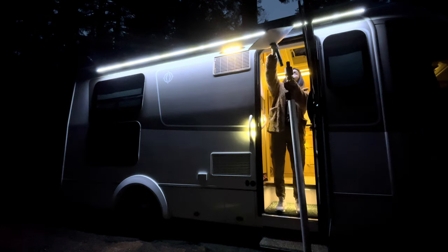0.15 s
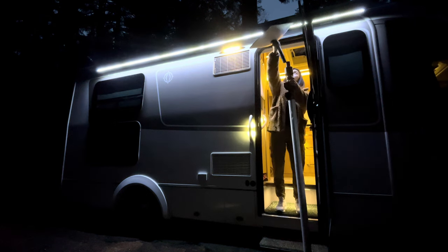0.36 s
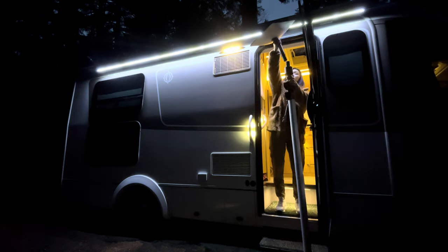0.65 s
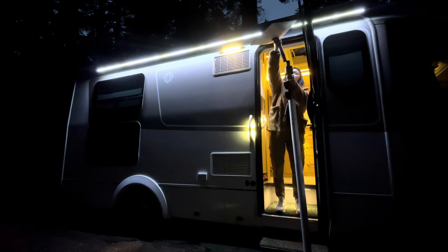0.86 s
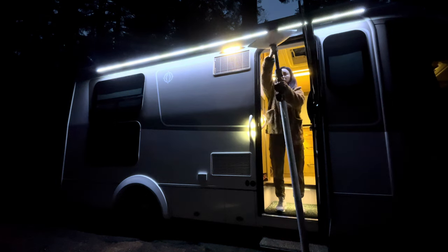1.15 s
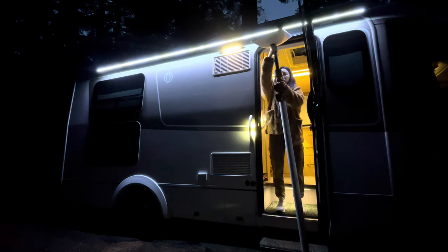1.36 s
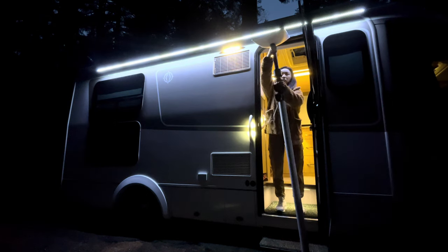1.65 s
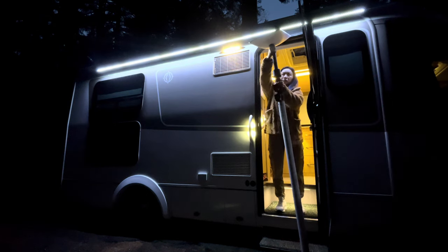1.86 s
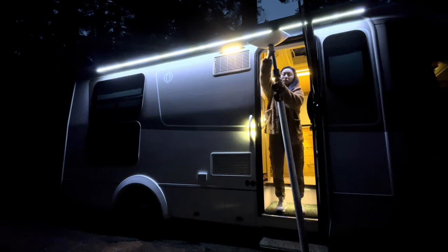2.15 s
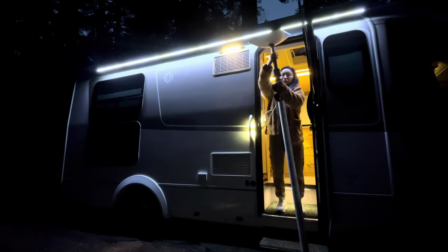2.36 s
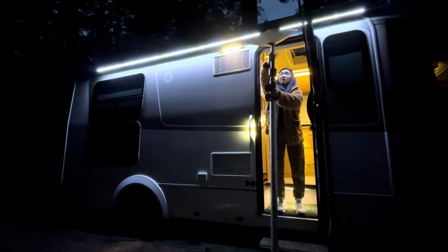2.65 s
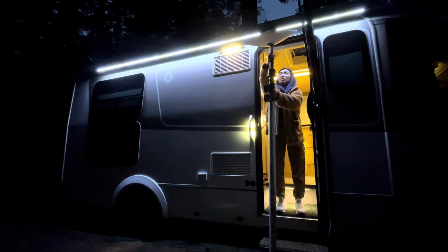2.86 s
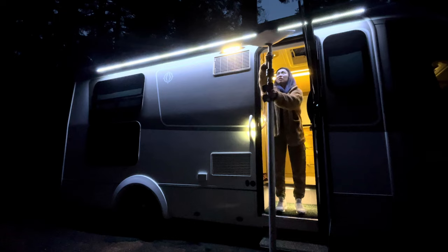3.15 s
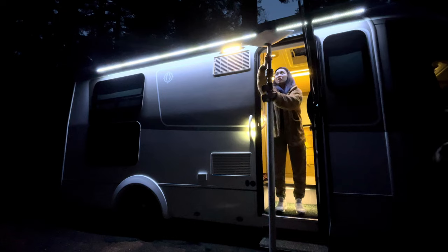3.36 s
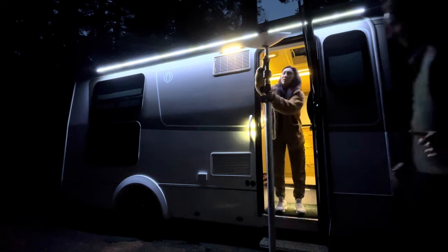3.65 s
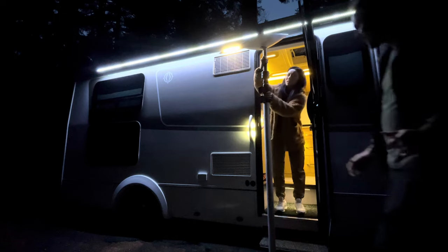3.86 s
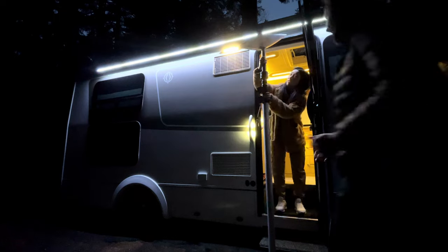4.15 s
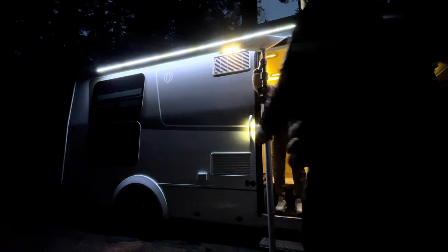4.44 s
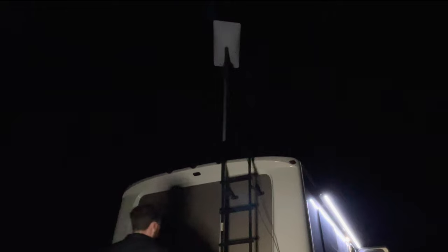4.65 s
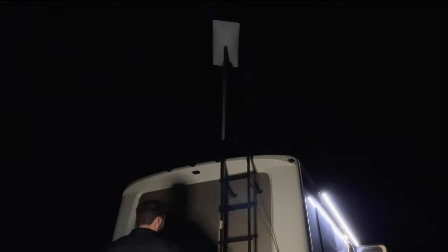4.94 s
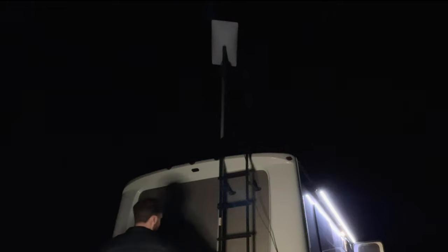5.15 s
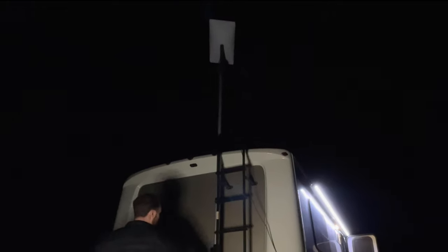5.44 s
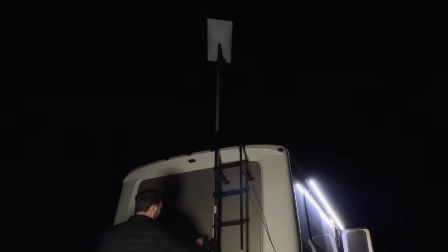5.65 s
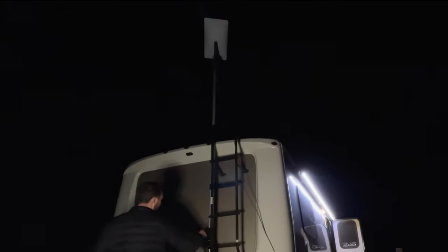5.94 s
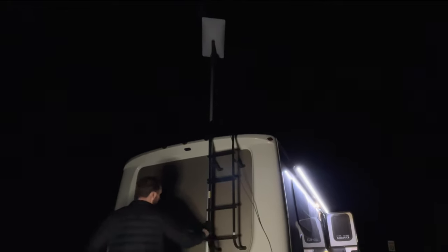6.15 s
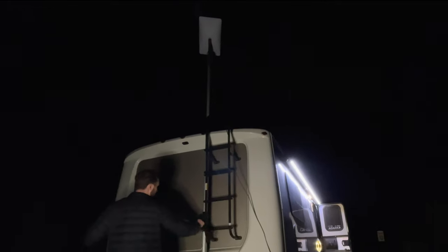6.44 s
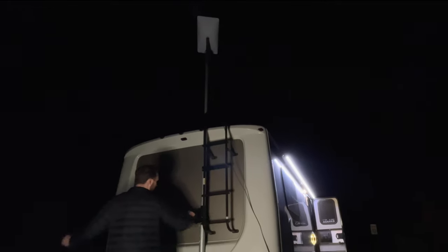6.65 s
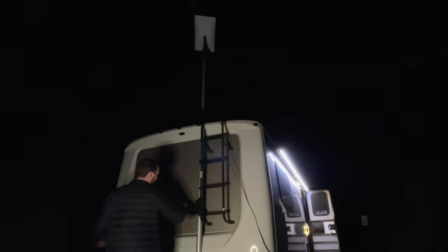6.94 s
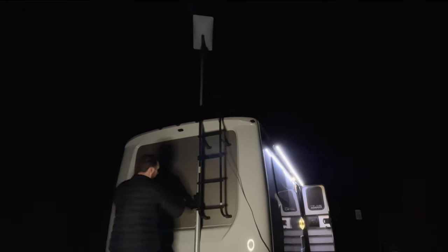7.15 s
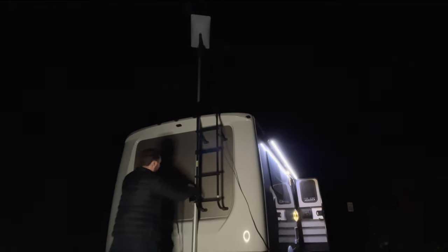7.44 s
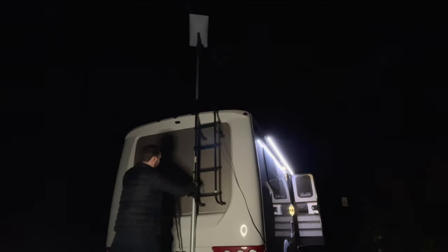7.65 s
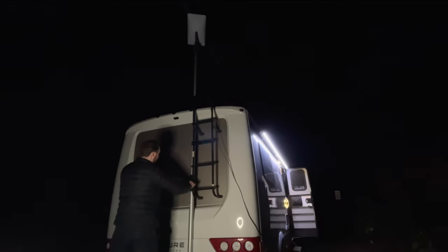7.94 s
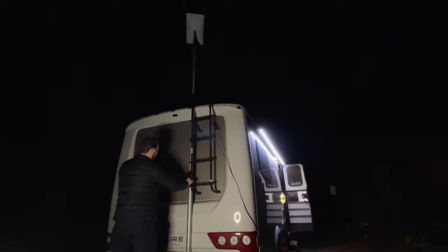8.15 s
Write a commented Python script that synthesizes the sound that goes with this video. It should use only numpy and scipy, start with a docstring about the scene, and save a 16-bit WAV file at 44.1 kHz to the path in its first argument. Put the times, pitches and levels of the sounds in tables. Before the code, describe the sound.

Quiet outdoor night, faint hiss leaning right, thin low rumble. From 0.1 to 0.8 s tiny dry ticks of a pole fitting; at 0.85-0.9 a quick rattly clack with a faint hollow bong. Soft tube bongs and a sleeve swish around 1.1-1.5, then at 1.8 by far the loudest event: a bright, clattery catch snap with a short echo. Small scrapes and rustle follow around 2.1. At 2.7 a sharp dry joint knock, at 2.98 a high ringing clamp clink, at 3.45 a strong double knock, then weaker knocks to 4.3 and rattling clinks at 4.4-4.5. At 4.6 an abrupt cut behind the van: louder, deep, nearly mono rumble and a faint low drone. A soft thud and knock at 5.0; cloth and hands rub, swelling at 6.1 and 6.6. Faint knock at 7.6, then dull woody-metal ladder knocks at 7.85-8.05, strongest near 8, with a brief swish, ending in rumble.

```python
"""A telescopic metal pole is put together at night beside a parked van: the tube bongs, a catch snaps, a clamp
rings, sections knock into their joints; each body is a set of decaying modes with a burst of noisy rattle.
Sleeves swish and hands rub: clumpy banded noise and ringing slips. A few short narrow tones come between.
From 4.6 s the listener stands behind the van in a louder low rumble of filtered noise, and the pole knocks
softly on a ladder. A faint night hiss lies under it all."""
import sys
import numpy as np
from scipy import signal
from scipy.fft import rfft, irfft
from scipy.io import wavfile

SR = 44100
rng = np.random.default_rng(int(sys.argv[2]) if len(sys.argv) > 2 else 0)


def put_to_file(sound):
    """Save the sound as 16-bit audio at rate SR, in the file named by the first command-line argument."""
    columns = np.atleast_2d(sound).T  # one column per channel
    safe = np.clip(columns, -1, 1)
    whole_steps = np.round(safe * 32767)
    wavfile.write(sys.argv[1], SR, whole_steps.astype(np.int16))


N = 366471
MOVE_S = 4.603   # from here on the listener is behind the van
BEHIND_VAN = np.arange(N) >= MOVE_S * SR

# Bongs of the tube. Each row: start in seconds, peak of the lows in dB, peak of the highs in dB,
# rattle T60 in seconds; peaks are those before panning.
TUBE_BONGS = [(0.815, -46.5, -36, 0.11), (0.889, -61, -47, 0.03), (1.107, -45.5, -38.5, 0.086),
              (1.431, -44, -63, 0.11), (1.806, -37.5, -41, 0.091), (2.057, -88, -43, 0.04),
              (2.708, -42.5, -41.5, 0.45)]
# Modes of the hollow tube. Each row: pitch in Hz, relative level in dB, T60 in seconds.
TUBE_MODES = [(167, -2, .2), (465, -6, .16), (425, -3, .055), (1040, -6, .06)]
# Colour of the tube's rattle. Each row: frequency in Hz, relative level in dB.
TUBE_RATTLE_COLOUR = [(100, -20.5), (450, -23.5), (2400, -31), (8000, -44)]


def tube_bongs():
    """The hollow tube rings in a few low modes; the blow decides how much of the highs it wakes."""
    return blows(TUBE_BONGS, TUBE_MODES, TUBE_RATTLE_COLOUR, rattle_db=-15.5, rise_ms=1.7, pan_db=-2.0,
                 split_hz=310, lag=4, spread=0.0043)


# The catch snapping. Each row: start in seconds, peak of the lows in dB, peak of the highs in dB,
# rattle T60 in seconds; peaks are those before panning.
CATCH_SNAPS = [(1.793, -10, -6, 0.094)]
# Modes of the catch. Each row: pitch in Hz, relative level in dB, T60 in seconds.
CATCH_MODES = [(732, -19, .06), (1745, -14, .045), (1895, -14, .05), (2155, -14, .06), (4550, -10, .07),
               (4880, -27, .45), (4950, -8, .09), (5185, -5, .07), (5230, -27, .55), (6090, -27, .4),
               (6595, -13, .04), (6110, -7, .065), (11800, -12, .03)]
# Colour of the catch's rattle. Each row: frequency in Hz, relative level in dB.
CATCH_RATTLE_COLOUR = [(200, -27), (715, -14), (1380, -22), (2000, -10), (3070, -27), (5110, -2.5),
                       (7220, -9.5), (12000, -14.5), (15500, -22.5)]


def catch_snaps():
    """Loose parts of the catch split each bright mode into a wide cluster of nine."""
    return blows(CATCH_SNAPS, CATCH_MODES, CATCH_RATTLE_COLOUR, rattle_db=2.5, rise_ms=1.0, pan_db=-0.5,
                 spread=0.015, size=16384, count=9)


# Clinks of the clamp. Each row: start in seconds, peak of the lows in dB, peak of the highs in dB,
# rattle T60 in seconds; peaks are those before panning.
CLAMP_CLINKS = [(2.98, -37.5, -15, 0.14), (2.992, -39.5, -18, 0.11), (3.771, -54, -39.5, 0.13),
                (4.513, -43, -33.5, 0.23), (4.526, -53, -29, 0.19)]
# Modes of the clamp. Each row: pitch in Hz, relative level in dB, T60 in seconds.
CLAMP_MODES = [(2073, -9, .21), (3984, -33, .36), (4500, -5, .016), (6455, -11, .16), (6600, -9, .08),
               (9437, -19, .1), (13200, -11, .04)]
# Colour of the clamp's rattle. Each row: frequency in Hz, relative level in dB.
CLAMP_RATTLE_COLOUR = [(300, -1.5), (4140, -7), (5570, -14), (6460, -3), (7620, -8.5), (13000, -9.5),
                       (15500, -20)]


def clamp_clinks():
    """The clamp rings in high modes, each a tight cluster of three."""
    return blows(CLAMP_CLINKS, CLAMP_MODES, CLAMP_RATTLE_COLOUR, rattle_db=-7.5, rise_ms=1.0, pan_db=0.5,
                 spread=0.00393, size=16384)


# Sections knocking into their joints. Each row: start in seconds, peak of the lows in dB,
# peak of the highs in dB, rattle T60 in seconds; peaks are those before panning.
JOINT_KNOCKS = [(1.803, -19, -42, 0.036), (2.681, -41.5, -42, 0.11), (2.691, -18.5, -50, 0.015),
                (2.696, -42, -14, 0.072), (2.706, -24.5, -43, 0.029), (2.759, -40.5, -63, 0.062),
                (3.44, -30, -20.5, 0.042), (3.455, -18, -14, 0.059), (3.488, -29, -34, 0.031),
                (3.501, -32.5, -33.5, 0.032), (3.711, -34.5, -77, 0.081), (4.096, -39.5, -50.5, 0.13),
                (4.104, -33, -54, 0.057), (4.181, -36.5, -38, 0.1), (4.266, -39, -31.5, 0.04),
                (4.317, -45.5, -47, 0.015)]
# Modes of a joint. Each row: pitch in Hz, relative level in dB, T60 in seconds.
JOINT_MODES = [(866, -12, .035), (964, -10, .04), (1120, -11, .035), (1600, -14, .035)]
# Colour of the joint's rattle. Each row: frequency in Hz, relative level in dB.
JOINT_RATTLE_COLOUR = [(200, -21.5), (630, -6.5), (957, 17.5), (1350, 4.5), (4660, -13.5), (7480, -22),
                       (13000, -20), (15500, -32.5)]


def joint_knocks():
    """A joint's close-set modes die fast, which makes a short, dry knock."""
    return blows(JOINT_KNOCKS, JOINT_MODES, JOINT_RATTLE_COLOUR, rattle_db=-9.0, rise_ms=0.96, pan_db=-3.0, lag=2)


# Three gestures of a fitting: sharp ticks, ringing clacks of the loose fitting, scrapes along the tube.
# Each row: start in seconds, peak of the lows in dB, peak of the highs in dB, rattle T60 in seconds;
# peaks are those before panning.
FITTING_TICKS = [(0.072, -41.5, -48, 0.058), (0.118, -34, -40.5, 0.082), (0.154, -44.5, -45, 0.044),
                 (0.34, -43.5, -45, 0.16), (0.7, -45, -55, 0.08), (0.748, -40, -44, 0.075),
                 (1.455, -36, -69, 0.14), (1.526, -44.5, -40.5, 0.11), (1.909, -37, -35.5, 0.036),
                 (2.418, -48, -38, 0.088), (3.153, -44.5, -62, 0.037), (3.957, -67, -47, 0.034)]
FITTING_CLACKS = [(0.85, -37, -40, 0.071), (0.866, -44, -38, 0.027), (0.875, -38, -36, 0.079),
                  (0.889, -25, -31.5, 0.025), (0.902, -29, -35, 0.02), (4.382, -54, -37, 0.056),
                  (4.391, -58, -33.5, 0.061), (4.4, -45, -31, 0.042), (4.42, -45, -34, 0.042)]
FITTING_SCUFFS = [(2.053, -42, -41, 0.046), (2.114, -42, -38, 0.19), (2.86, -44, -47, 0.07)]
# Modes of the fitting. Each row: pitch in Hz, relative level in dB, T60 in seconds.
FITTING_MODES = [(2500, -13, .025), (3600, -9, .014)]
# Colour of the fitting's rattle. Each row: frequency in Hz, relative level in dB.
FITTING_RATTLE_COLOUR = [(200, -13), (940, -12), (2560, -12), (9480, -16), (15500, -26.5)]


def fitting_sounds():
    """Two short modes: fast noisy onsets tick, ringing ones clack, slow onsets scrape."""
    body = (FITTING_MODES, FITTING_RATTLE_COLOUR)
    ticks = blows(FITTING_TICKS, *body, rattle_db=6.0, rise_ms=0.21, pan_db=-2, lag=18)
    clacks = blows(FITTING_CLACKS, *body, rattle_db=-16.0, rise_ms=1.0, pan_db=-3.5,
                   split_hz=3200, lag=18, spread=0.01)   # split between the two modes
    scuffs = blows(FITTING_SCUFFS, *body, rattle_db=-21.0, rise_ms=11.0, pan_db=-4.0, split_hz=2000, lag=18)
    return ticks + clacks + scuffs


# The pole knocking on the ladder. Each row: start in seconds, peak of the lows in dB,
# peak of the highs in dB, rattle T60 in seconds; peaks are those before panning.
POLE_ON_LADDER = [(4.973, -44.5, -46, 0.11), (7.567, -47, -64, 0.068), (7.846, -32, -46.5, 0.061),
                  (7.974, -25, -48, 0.012), (7.994, -31.5, -58, 0.13), (7.999, -47, -36, 0.066),
                  (8.043, -34, -51, 0.12)]
# Modes of the ladder. Each row: pitch in Hz, relative level in dB, T60 in seconds.
LADDER_MODES = [(880, -5, .07), (1300, -7, .11), (2300, -16, .03)]
# Colour of the ladder's rattle. Each row: frequency in Hz, relative level in dB.
LADDER_RATTLE_COLOUR = [(300, -3), (892, 11), (1560, -2), (2560, -21), (4570, -39.5), (15500, -57)]


def ladder_knocks():
    """A slow onset and a dull rattle make the ladder's knocks soft; they sit left."""
    return blows(POLE_ON_LADDER, LADDER_MODES, LADDER_RATTLE_COLOUR, rattle_db=7.5, rise_ms=4.2, pan_db=4.0, lag=-4)


# Thuds of a foot. Each row: start in seconds, peak of the lows in dB, peak of the highs in dB,
# rattle T60 in seconds; peaks are those before panning.
FOOT_THUDS = [(3.512, -44, -39.5, 0.11), (4.971, -44, -39, 0.028)]
# Modes of the thud. Each row: pitch in Hz, relative level in dB, T60 in seconds.
FOOT_MODES = [(93, 11, 0.026), (205, 1.5, 0.022), (568, -23.5, 0.11)]
# Colour of the thud's rattle. Each row: frequency in Hz, relative level in dB.
FOOT_RATTLE_COLOUR = [(40, -72), (100, -12), (500, 13), (1500, -21), (8000, -71)]


def foot_thuds():
    """Strongly damped low modes with a slow onset make a thud."""
    return blows(FOOT_THUDS, FOOT_MODES, FOOT_RATTLE_COLOUR, rattle_db=-13.5, rise_ms=8.5, pan_db=-3.5, split_hz=210)


# Colour of cloth and hands. Each row: frequency in Hz, relative level in dB.
CLOTH_COLOUR = [(250, -5), (650, -9.5), (1000, -8.5), (1500, -11.5), (2400, -11.5), (3200, -14.5),
                (6900, -15.5), (10100, -18.5), (12500, -20), (15800, -28.5)]
# Bands that colour the rubbing behind the van. Each row: centre in Hz, width in Hz,
# level in dB against the unit hiss when the stroke is at -43.5 dB.
RUBBING_BANDS = [(2050, 400, -5), (2450, 130, -7), (2800, 150, -14)]
# One more band glides up with the stroke: pitch at a -50.5 dB stroke, level at a -43.5 dB stroke.
GLIDE_HZ, GLIDE_HZ_PER_DB, GLIDE_WIDTH_HZ, GLIDE_DB = 888, 50, 36, -5
RUB_GROWTH = 0.62   # dB that all these bands gain on the hiss for each dB of stroke


def rustle():
    """Cloth and hands rubbing: noise in clumps of tiny slips, some of which ring."""
    level_db, brightness = movement()
    slips = from_db(1.2 * np.minimum(rng.exponential(1, N), 6) + 1.8 * drift(51))
    hiss = banded_noise(CLOTH_COLOUR, patchy_db=2.0, tilt_db=brightness, grain=slips)
    rub = sum(from_db(db + 4.0 * drift(31.0)) * narrow(hz, width_hz) for hz, width_hz, db in RUBBING_BANDS)
    glide_hz = np.maximum(GLIDE_HZ + GLIDE_HZ_PER_DB * (level_db + 50.5), 450)
    rub = rub + from_db(GLIDE_DB + 4.1 * drift(30.0)) * narrow(glide_hz, GLIDE_WIDTH_HZ)
    rub = rub * from_db(RUB_GROWTH * (level_db + 43.5)) * BEHIND_VAN
    ringing = from_db(-6.5) * squeaks(per_s=100, low_hz=514.0, high_hz=2360, cycles=45)
    return from_db(level_db) * (hiss + rub + ringing)


# Cloth and hands never quite at rest. Each row: time in seconds, level in dB before the brightness tilt,
# brightness in dB per octave about 2 kHz.
FIDGETING = [(0.0, -66.5, -4.5), (0.44, -83, 0), (0.94, -62, 0), (1.3, -67, -3), (1.75, -62.5, -1),
             (1.9, -55, 1.5), (2.2, -60, 1), (2.4, -67.5, -0.5), (2.66, -72, -5), (3.0, -59, 1.5),
             (3.38, -63.5, -3), (3.68, -59, 0.5), (4.0, -69.5, -2.5), (4.5, -59.5, 2), (4.94, -63, 0.5),
             (5.47, -69, -3), (6.35, -63.5, -2), (6.88, -79.5, -5), (7.2, -65, -0.5), (7.45, -71.5, -1),
             (7.7, -57, -1.5), (7.97, -58, 0), (8.18, -73, -7), (8.31, -60.5, -1)]
# Single swishes of a sleeve or a hand. Each row: time of the peak in seconds, peak in dB before the
# brightness tilt, length in seconds, brightness in dB per octave about 2 kHz.
SLEEVE_SWISHES = [(0.17, -62.5, 0.28, 1), (1.455, -50.5, 0.074, 0), (1.56, -61.5, 0.32, 4),
                  (2.029, -48.5, 0.11, -0.5), (2.495, -59.5, 0.22, -1.5), (2.756, -46, 0.068, -2.5),
                  (2.866, -54, 0.59, -1.5), (3.564, -58.5, 0.46, 2), (4.156, -56.5, 0.26, 1),
                  (4.283, -56, 0.21, 4), (5.038, -58, 0.63, 1), (5.624, -67.5, 0.23, 1),
                  (6.147, -51, 0.39, -0.5), (6.575, -48.5, 0.34, 0), (6.712, -58.5, .15, 0),
                  (7.554, -54.5, 0.21, -0.5), (7.881, -59.5, 0.17, -2), (8.056, -49, 0.074, -1.5)]
SWISH_RISE_SHARE, SWISH_EDGE_DB = .45, -17   # share of the length before the peak; both ends against the peak


def movement():
    """Fidgeting and swelling swishes add as power; the louder ones set the brightness."""
    level_db, brightness = in_time(FIDGETING)
    power, t = from_db(2 * level_db), np.arange(N) / SR
    weighted = brightness * power
    for peak_s, db, length, tilt in SLEEVE_SWISHES:
        rising, falling = (peak_s - t) / SWISH_RISE_SHARE, (t - peak_s) / (1 - SWISH_RISE_SHARE)
        away = np.where(t < peak_s, rising, falling) / length   # 0 at the peak, 1 at either end
        swish = from_db(2 * np.maximum(db + SWISH_EDGE_DB * away ** 1.3, -200))
        power, weighted = power + swish, weighted + tilt * swish
    return 10 * np.log10(power), weighted / power


def squeaks(per_s, low_hz, high_hz, cycles):
    """Random slips of a rubbed surface excite 24 resonators that fall 60 dB in a number of cycles; rms 1."""
    slips = (rng.random((2, N)) < per_s / SR) * rng.standard_normal((2, N)) + 1e-18
    dealt, out = rng.integers(0, 24, N), 0   # which resonator each slip strikes
    for k, hz in enumerate(np.geomspace(low_hz, high_hz, 24)):
        r, w = from_db(-60 * hz / cycles / SR), 2 * np.pi * hz / SR
        mid, side = signal.lfilter([0, np.sin(w)], [1, -2 * r * np.cos(w), r * r], slips * (dealt == k))
        out = out + from_db(at_hz(CLOTH_COLOUR, hz)) * stereo(mid, side, hz)
    return rms_one(out)


# Short narrow tones: a high ring after a bong, a chirp, two groans, a low drone.
# Each row: start in seconds, length in seconds, pitch in Hz, level in dB before the fades.
NARROW_TONES = [(1.1, 0.073, 4850, -67), (2.472, 0.057, 1400, -63.5), (3.034, 0.28, 518, -64),
                (4.62, 0.73, 196, -65), (7.584, 0.18, 433, -61.5)]
TONE_WIDTH_HZ, TONE_FADE_S = 28, 0.009


def narrow_tones():
    """Narrow noise bands heard as wavering tones that fade in and out."""
    out, t = np.zeros((2, N + SR)), np.arange(SR) / SR
    for s, length, hz, db in NARROW_TONES:
        fade = np.clip(np.minimum(t, length - t) / TONE_FADE_S, 0, 1)
        at = round(s * SR)
        out[:, at:at + SR] += from_db(db) * fade * narrow(hz, TONE_WIDTH_HZ, size=SR)
    return out[:, :N]


# Far traffic and wind, louder behind the van. Each row: time in seconds, level in dB before
# the bass cut, the narrowing and the balance.
RUMBLE_LEVEL = [(0, -61), (.24, -78), (1.04, -71.5), (1.4, -57.5), (1.93, -64), (2.82, -59.5),
                (3.32, -62.5), (3.6, -60), (3.9, -67.5), (4.6, -70), (4.605, -53), (6.17, -54.5),
                (7.1, -53.5), (7.5, -54), (8.03, -47.5), (8.31, -54)]
# Colour of the rumble. Each row: frequency in Hz, relative level in dB.
RUMBLE_SPECTRUM = [(25, -22), (45, 2.5), (65, 5.5), (145, -7.5), (236, -7), (330, -23), (700, -33.5)]
BESIDE_CUT_HZ = 74   # beside the van the deepest rumble is weaker
BEHIND_SIDE_POWER = .1   # behind the van the left-right difference keeps this share of its power


def rumble():
    """Low banded noise: thinner in the bass beside the van, nearly mono behind it."""
    low = from_db(in_time(RUMBLE_LEVEL)[0]) * banded_noise(RUMBLE_SPECTRUM, patchy_db=0.0)
    behind = low.mean(axis=0) + BEHIND_SIDE_POWER ** .5 * (low - low[::-1]) / 2
    beside = signal.sosfilt(signal.butter(2, BESIDE_CUT_HZ, "high", fs=SR, output="sos"), low)
    return np.where(BEHIND_VAN, behind, beside)


# Colour of the night air. Each row: frequency in Hz, relative level in dB.
NIGHT_COLOUR = [(100, -1), (2040, -3), (5510, -18), (7560, -22), (11800, -24), (13900, -20.5), (15500, -40)]


def night_air():
    """Faint, steady wide-band noise with only a slight flicker."""
    return from_db(-71) * banded_noise(NIGHT_COLOUR, patchy_db=.5)


ECHO_DB, ECHO_T60_S, ECHO_CUT_HZ = -14, 0.14, 9400


def echoes(x):
    """A short, dull scatter of echoes from the van's side and the ground: decaying noise as impulse response."""
    t = np.arange(SR // 3) / SR
    scatter = rng.standard_normal((2, len(t))) * from_db(-60 * t / ECHO_T60_S) * (t > .004)
    scatter = signal.sosfilt(signal.butter(1, ECHO_CUT_HZ, fs=SR, output="sos"), scatter)
    return signal.fftconvolve(x, scatter / np.sqrt(np.sum(scatter ** 2) / 2), axes=1)[:, :N]


RISE_CYCLES = 1.5   # a mode swells over this many of its cycles, so lows start later
CRACK_SHARE, CRACK_T60_S = 2.2, .014   # extra height and decay of the first contact


def blows(events, modes, rattle, rattle_db, rise_ms, pan_db, split_hz=3500, lag=0, spread=0.0075, size=8192, count=3):
    """Each blow: a burst of rattle and the body's modes, with its own share of lows and highs.

    Positive pan_db leans left; lag delays the left in samples, a negative one advances it."""
    out, t = np.zeros((2, N + size)), np.arange(size) / SR
    hz = np.maximum(np.fft.rfftfreq(size, 1 / SR), 20)
    # loose parts split each mode into a cluster
    mode_hz, mode_db, mode_t60 = np.repeat(modes, count, axis=0).T[:, :, None]
    swell = 1 - np.exp(-t * mode_hz / RISE_CYCLES)
    envelope = swell * from_db(mode_db - 60 * t / mode_t60)
    for s, low_db, high_db, t60 in events:
        mid, side = rfft(rng.standard_normal((2, size))) * from_db(at_hz(rattle, hz))
        burst = rms_one(irfft(stereo(mid, side, hz))) * from_db(rattle_db - 60 * t / t60)
        burst = burst * (1 + CRACK_SHARE * from_db(-60 * t / CRACK_T60_S))
        split = mode_hz * (1 + rng.normal(0, spread, mode_hz.shape))
        phase = rng.uniform(0, 2 * np.pi, mode_hz.shape) + rng.normal(0, 0.075, (2, *mode_hz.shape))
        rings = np.sum(envelope * np.sin(2 * np.pi * split * t + phase), axis=1)
        blow = (1 - np.exp(-1000 * t / rise_ms)) * (burst + rings / np.sqrt(count))
        low = signal.sosfilt(signal.butter(4, split_hz, "low", fs=SR, output="sos"), blow)
        high = signal.sosfilt(signal.butter(4, split_hz, "high", fs=SR, output="sos"), blow)
        blow = from_db(low_db) * low / np.abs(low).max() + from_db(high_db) * high / np.abs(high).max()
        at = round(s * SR)
        out[0, at + lag:at + lag + size - 64] += from_db(pan_db / 2) * blow[0, :-64]
        out[1, at:at + size] += from_db(-pan_db / 2) * blow[1]
    return out[:, :N]


def banded_noise(spectrum, patchy_db, tilt_db=0, grain=1):
    """Third-octave bands of stereo noise, each flickering on its own; rms 1 before the tilt about 2 kHz."""
    out, power, together = 0, 0, drift(1.5)
    low_hz, high_hz = spectrum[0][0], spectrum[-1][0]
    edges = np.geomspace(low_hz, high_hz, round(3 * np.log2(high_hz / low_hz)) + 1)
    white = grain * rng.standard_normal((2, 2, N))   # neighbouring bands take turns with two sources
    for k, (low, high) in enumerate(zip(edges, edges[1:])):
        mid, side = signal.sosfilt(signal.butter(2, [low, high], "band", fs=SR, output="sos"), white[k % 2])
        hz = np.sqrt(low * high)
        flicker_db = patchy_db * (0.14 * together + drift(5.6))
        band = from_db(at_hz(spectrum, hz) + flicker_db) * stereo(mid, side, hz)
        out = out + band * from_db(tilt_db * np.log2(hz / 2000))
        power = power + np.mean(band ** 2)
    return out / np.sqrt(power)


def narrow(hz, width_hz, size=N):
    """Slow noise shifted up to a centre that may move: a narrow stereo band of rms 1."""
    lowpass = signal.butter(2, width_hz / 2, fs=SR, output="sos")
    slow = signal.sosfilt(lowpass, rng.standard_normal((2, 2, size)))
    turn = 2 * np.pi * np.cumsum(hz + np.zeros(size)) / SR
    mid, side = slow[0] * np.cos(turn) + slow[1] * np.sin(turn)
    return rms_one(stereo(mid, side, np.mean(hz)))


# Stereo width over pitch. Each row: frequency in Hz, left-right likeness from 0 (unrelated) to 1 (mono).
STEREO_LIKENESS = [(60, 0.32), (200, 0.54), (500, 0.17), (2000, 0.53), (8000, 0.073), (12000, 0.29)]


def stereo(mid, side, hz):
    """Two unrelated signals mixed to the left-right likeness of that pitch."""
    alike = at_hz(STEREO_LIKENESS, hz)
    return np.sqrt(1 + alike) * mid + np.sqrt(1 - alike) * side * [[1], [-1]]


def drift(rate_hz):
    """Slow random wander of rms near 1: low-passed noise made at a fortieth of the sample rate."""
    r = np.exp(-80 * np.pi * rate_hz / SR)
    slow = signal.lfilter([1], [1, -2 * r, r * r], rng.standard_normal(N // 40 + 2002))[2000:]
    return np.interp(np.arange(N) / 40, np.arange(len(slow)), rms_one(slow))


def from_db(db):
    """Decibels to amplitude."""
    return 10 ** (np.asarray(db) / 20)


def rms_one(x):
    """Scale to rms 1."""
    return x / np.sqrt(np.mean(x ** 2) + 1e-20)


def in_time(rows):
    """Draw each column after the first as a line over time."""
    s, *columns = np.transpose(rows)
    return [np.interp(np.arange(N) / SR, s, c) for c in columns]


def at_hz(points, hz):
    """Read a curve at a pitch, straight over log frequency."""
    curve_hz, values = np.array(points).T
    return np.interp(np.log(hz), np.log(curve_hz), values)


def scene():
    """The pole stops with its echoes at the move; thuds and surroundings are heard from both places,
    the ladder only behind the van."""
    pole = tube_bongs() + catch_snaps() + clamp_clinks() + joint_knocks() + fitting_sounds()
    pole = (pole + from_db(ECHO_DB) * echoes(pole)) * ~BEHIND_VAN
    soft_blows = foot_thuds() + ladder_knocks()
    soft_blows = soft_blows + from_db(ECHO_DB) * echoes(soft_blows)
    background = (rumble() + night_air()) * from_db([[-.7], [.7]])   # leans right
    around = rustle() + narrow_tones() + background
    # in samples: the right leads beside the van, the left behind it
    around[0] = np.where(BEHIND_VAN, np.roll(around[0], -4), np.roll(around[0], 2))
    return pole + soft_blows + around


def record(dry):
    """The microphone drops the lowest bass; the top is cut steeply at 16.7 kHz."""
    dry = signal.sosfilt(signal.butter(2, 45, "high", fs=SR, output="sos"), dry)
    return signal.sosfilt(signal.cheby2(12, 70, 16700, fs=SR, output="sos"), dry)


dry = scene()
out = record(dry)
put_to_file(out)
```